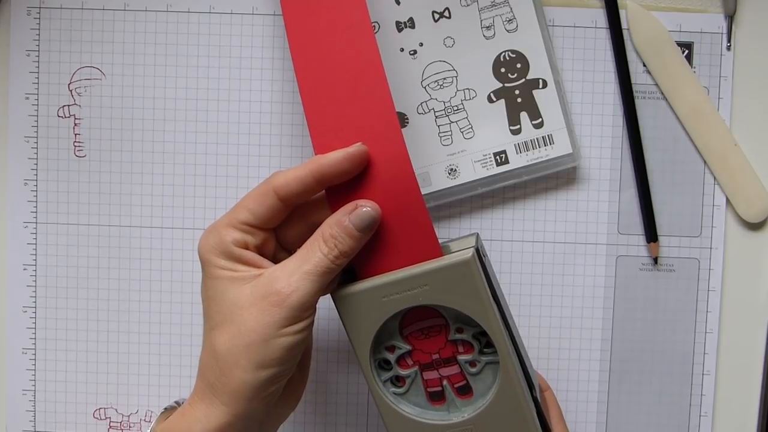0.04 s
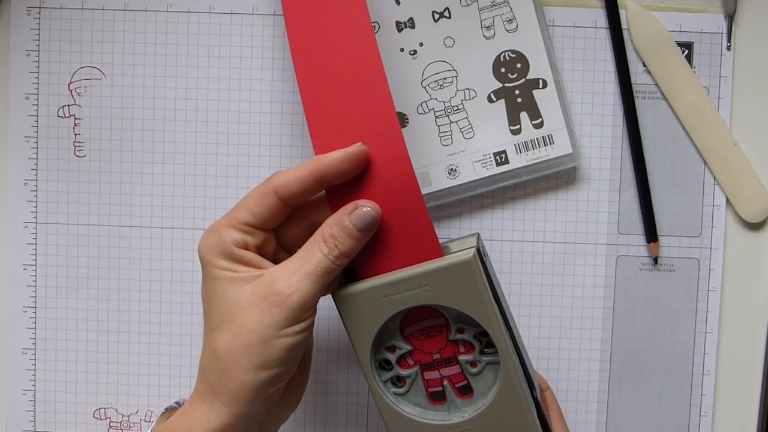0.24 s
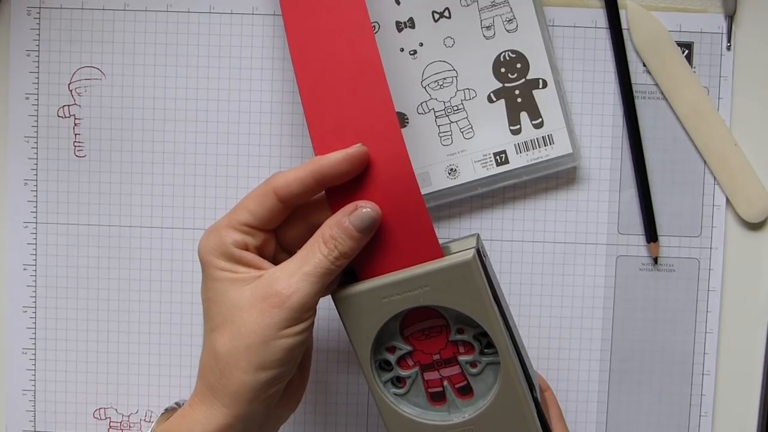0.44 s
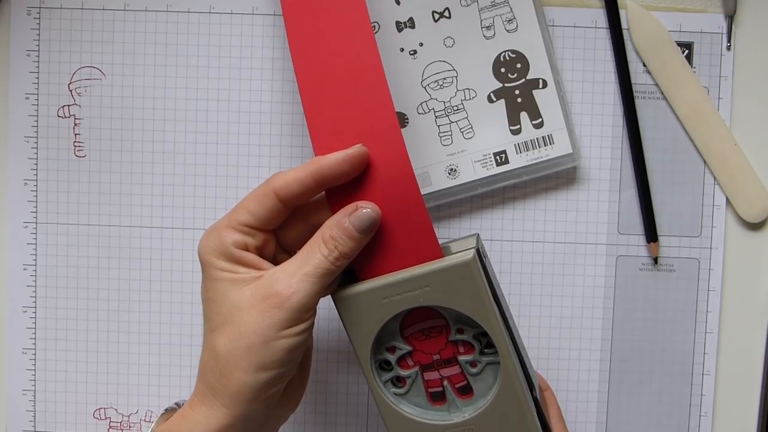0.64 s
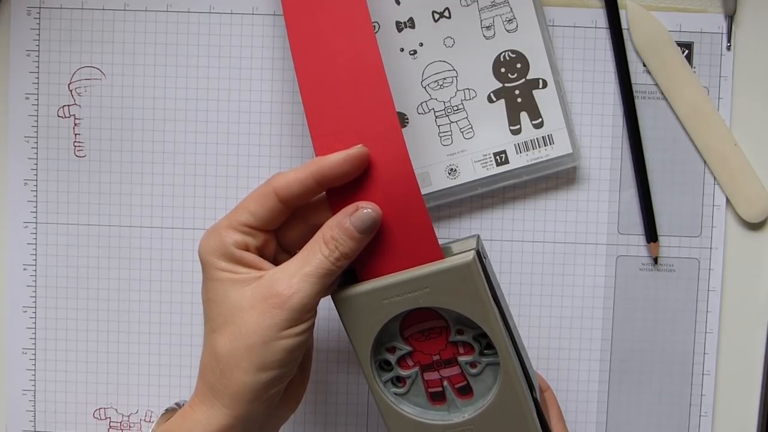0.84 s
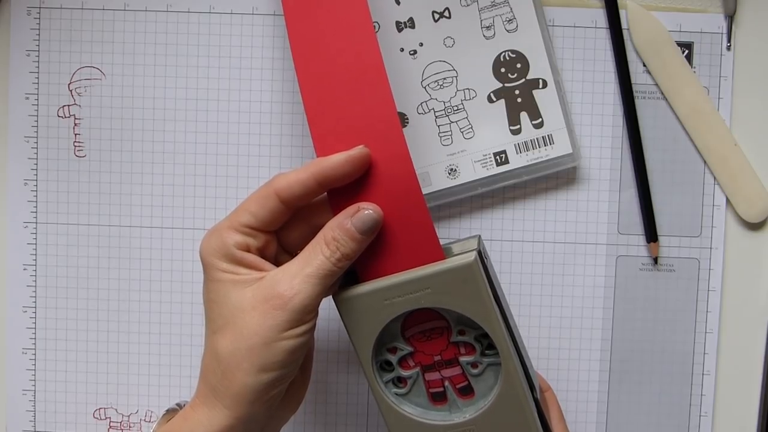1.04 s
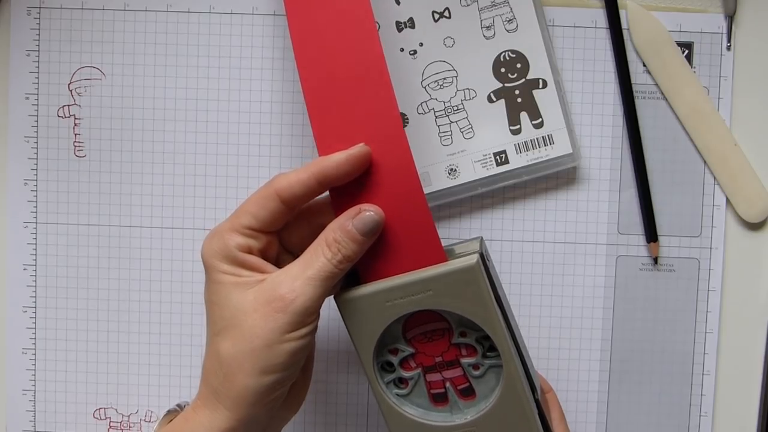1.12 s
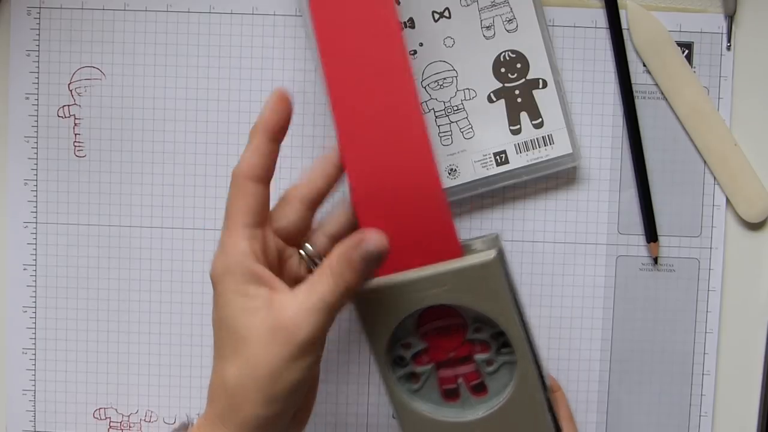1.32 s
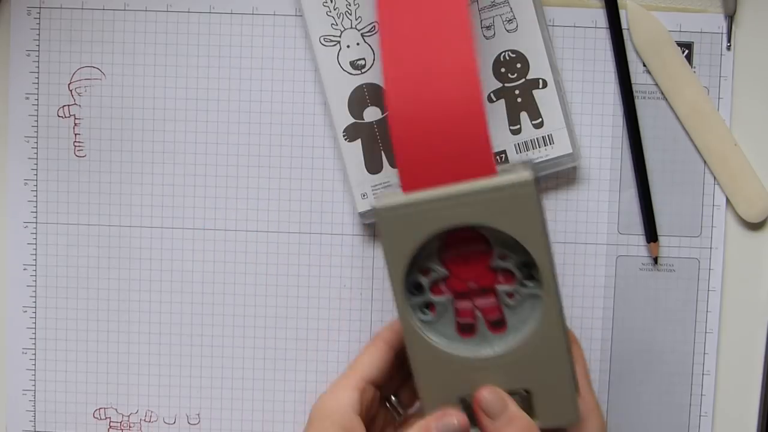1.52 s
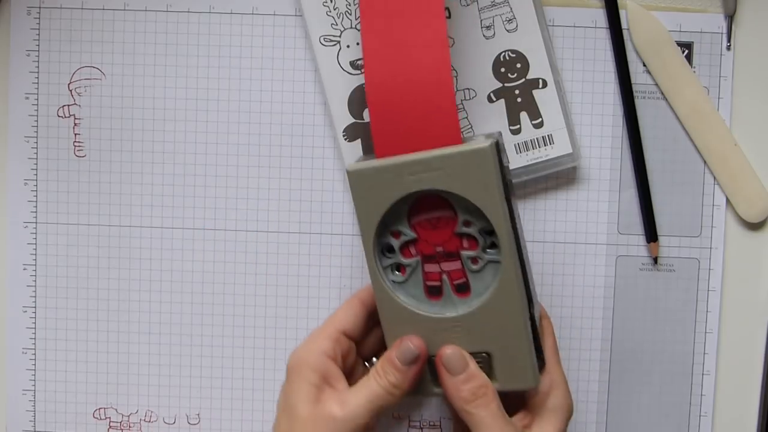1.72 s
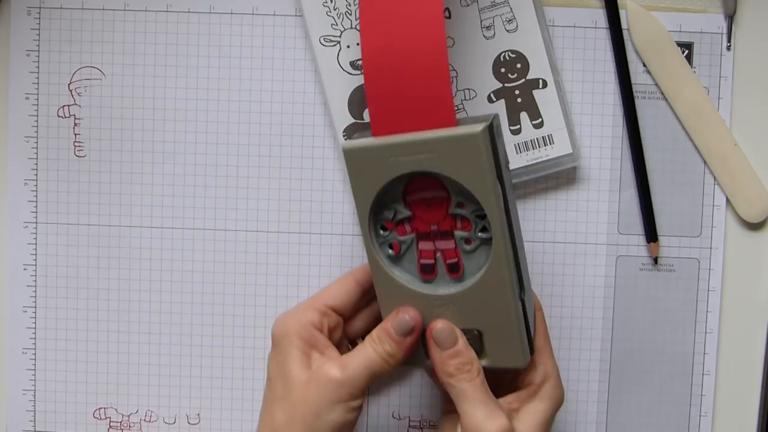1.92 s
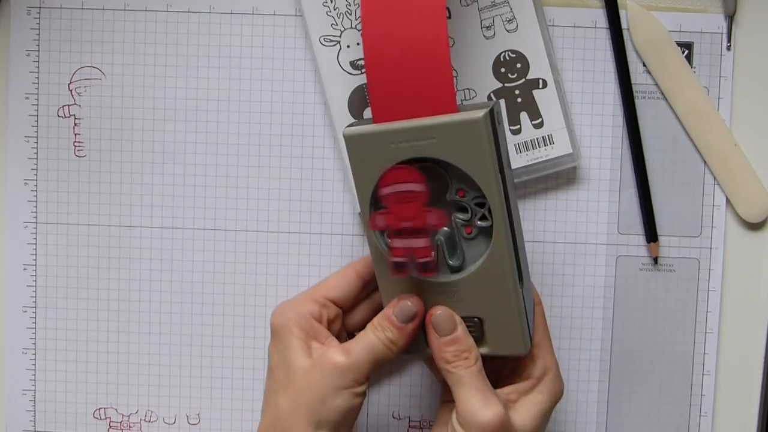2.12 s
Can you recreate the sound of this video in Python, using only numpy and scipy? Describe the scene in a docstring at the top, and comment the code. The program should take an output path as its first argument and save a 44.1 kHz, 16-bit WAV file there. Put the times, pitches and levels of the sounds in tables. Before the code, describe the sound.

A handheld craft punch snaps through card in a small quiet room, heard close. Until about 1.2 s there is only soft hush, a faint low hum and barely audible ticks. From 1.2 to 1.7 s fingers and card rustle and creak, with a tiny metal chink near 1.47. Sharp clacks hit at 1.76, 1.82 and loudest 1.88 s, with gritty scraping, then a bright final snap at 2.12.

```python
"""A craft punch, shifted by hand over a desk and squeezed through card, snaps in sharp clacks in a quiet room.
Each snap rings modes of the housing and its hollow and throws a noise crack; some start with a bare click.
Gritty scraping between them is a dense run of tiny slips exciting the same parts. Before that come
faint ticks, a creak and a rustle of fingers and card, made of shaped noise, and a small metal chink.
Near echoes and a short tail place it all in the room, over a noise hush and faint wavering tones."""
import sys
import numpy as np
from scipy import signal
from scipy.fft import rfft, irfft
from scipy.io import wavfile
from scipy.ndimage import uniform_filter1d

SR = 44100
rng = np.random.default_rng(int(sys.argv[2]) if len(sys.argv) > 2 else 0)


def digitize_waveform(pressure):
    """Quantize a signal to 16-bit integers and store it at the path in sys.argv[1].

    Rows of a 2-D input are taken as channels; values are limited to [-1, 1].
    """
    field = np.atleast_2d(pressure).T
    bounded = np.clip(field, -1, 1)
    quanta = np.round(bounded * 32767).astype(np.int16)
    wavfile.write(sys.argv[1], SR, quanta)


def magnitude_from_level(level_db):
    """Linear magnitude for a level in decibels (20 dB per decade)."""
    exponent = np.asarray(level_db, float) / 20
    return 10 ** exponent


N = 94815  # length in samples

# Modes of the punch housing. Each row: pitch in Hz, relative level in dB, 60 dB decay time in seconds.
HOUSING = [(1500, 3.5, 0.046), (1815, -2.5, 0.034), (2000, 2.5, 0.042), (2180, 1.5, 0.011),
           (2394, -4, 0.059), (2600, -1, 0.041), (2958, -2.5, 0.039), (3190, -3, 0.039), (3665, -7, 0.081),
           (4100, 0.5, 0.031), (4597, 2.5, 0.017), (5100, -0.5, 0.019), (5450, 9.5, 0.0095)]
# Modes of the hollow of the punch and the desk under it. Each row: pitch in Hz, relative level in dB,
# 60 dB decay time in seconds.
HOLLOW = [(390, -6, 0.022), (517, -7.5, 0.068), (623, -1, 0.015), (809, 6, 0.049), (985, 4.5, 0.046),
          (1148, 0, 0.091), (1274, 3, 0.044)]
HOUSING_LOW_HZ, HOLLOW_LOW_HZ = 1275, 320  # little radiates below these


def evened(x):
    """Scales to rms 1."""
    return x / np.sqrt(np.mean(x ** 2) + 1e-20)


def read(points, hz):
    """Reads a table on a log-frequency axis."""
    f, value = np.transpose(points)
    return np.interp(np.log(hz + 1), np.log(f + 1), value)


def add(mix, s, sound):
    """Mixes a sound in at time s."""
    part = mix[round(s * SR):][:len(sound)]
    part += sound[:len(part)]


def colour(x, points):
    """Filters by a spectrum."""
    hz = np.fft.rfftfreq(len(x), 1 / SR)
    return irfft(rfft(x) * magnitude_from_level(read(points, hz)), len(x))


def high_pass(x, hz):
    """Steep causal low cut."""
    return signal.sosfilt(signal.butter(4, hz, "high", fs=SR, output="sos"), x)


def ring(modes, low_hz, favoured_hz=0, detune=0.006):
    """Dying modes, each struck a little differently, those near the favoured pitch harder; energy 1."""
    strike_spread_db, favour_db, favour_octaves = 2, 6.5, 0.1
    hz, db, t60 = np.transpose(modes)[:, :, None]
    t = np.arange(4096) / SR
    strike, sign, shift = rng.standard_normal((3, len(modes), 1))
    octaves_off = np.log2(hz / (favoured_hz + 1))
    db = db + strike_spread_db * strike + favour_db * np.exp(-(octaves_off / favour_octaves) ** 2)
    waves = np.sin(2 * np.pi * hz * (1 + detune * shift) * t) * np.sign(sign)
    out = (magnitude_from_level(db - 60 * t / t60) * waves).sum(0)
    out = high_pass(out, low_hz)
    return out / np.linalg.norm(out)


def crack():
    """A splinter of bright noise dying fast; energy 1."""
    # Spectrum of the splintering noise. Each row: frequency in Hz, relative level in dB.
    crack_tone = [(1200, -27), (1900, -0.5), (2900, 1), (5300, -2.5), (6200, -0.5), (10300, -4.5),
                  (13200, -9.5), (15500, -21), (16500, -39)]
    t60_s = 0.023
    fade = magnitude_from_level(-60 * np.arange(4096) / SR / t60_s)
    out = colour(rng.standard_normal(4096), crack_tone) * fade
    out = high_pass(out, HOUSING_LOW_HZ)
    return out / np.linalg.norm(out)


def snap(ring_db, favoured_hz, thud_db, crack_db):
    """One hard contact knocks the struck spot, rings housing and hollow and throws a crack."""
    rise_s = 0.00049
    rise = np.minimum(np.arange(4096) / SR / rise_s, 1)
    # the struck spot's own quick resonance: 12 dB ahead of the favouring in ring, dying in 11 ms
    parts = HOUSING + [(favoured_hz, 12, 0.011)]
    shell = magnitude_from_level(ring_db) * ring(parts, HOUSING_LOW_HZ, favoured_hz) + magnitude_from_level(crack_db) * crack()
    thud = magnitude_from_level(thud_db) * ring(HOLLOW, HOLLOW_LOW_HZ)
    return high_pass(shell * rise, HOUSING_LOW_HZ) + high_pass(thud * rise, HOLLOW_LOW_HZ)


def click(db, low_hz, full_band_db):
    """Bare metal on metal: one sharp pulse, bright above its edge. A weaker full-band pulse sounds with it."""
    pulse = signal.unit_impulse(512)
    return magnitude_from_level(db) * high_pass(pulse, low_hz) + magnitude_from_level(full_band_db) * pulse


def scrape():
    """Card and die scraping: dense slips of uneven size excite the same parts under the pressure curve."""
    # Pressure curve of the scraping. Each row: time in seconds, rms level of the slips in dB,
    # share of hollow thud in dB and share of crack in dB, both against the housing ring.
    pressure = [(1.75, -71, -2, -9), (1.756, -52.5, 1, 6), (1.79, -41.5, -8.5, -10), (1.812, -42, -32, -4),
                (1.84, -41.5, -1.5, 1), (1.875, -37, -14, -9.5), (1.91, -41.5, 1, 4.5),
                (1.935, -35, -0.5, 0.5), (1.948, -30, -13, -1), (1.975, -43.5, -5, 0.5),
                (1.993, -57, -11, 4), (2.005, -44.5, -10, 4), (2.026, -53, -21, 3.5), (2.05, -55, -7, 6.5),
                (2.065, -36, -7, 4), (2.071, -45, -10.5, 14.5), (2.077, -41.5, -1.5, 7),
                (2.095, -51.5, -6, 7), (2.118, -52, -2, -4), (2.13, -41, -23, 13.5), (2.15, -40, -28, 10.5)]
    slips_per_s, slip_spread_db, slip_detune, runs = 1000, 4.5, 0.03, 6
    s, db, thud_db, crack_db = np.transpose(pressure)
    t, out = np.arange(N) / SR, np.zeros(N)
    curve = magnitude_from_level(np.interp(t, s, db, left=-120))
    for _ in range(runs):  # each run of slips meets the parts struck afresh
        size = magnitude_from_level(slip_spread_db * rng.exponential(1, N).clip(0, 3))
        grit = (rng.random(N) < slips_per_s / runs / SR) * size
        grit = evened(grit * rng.choice([-1, 1], N)) * curve / np.sqrt(runs)
        shell = ring(HOUSING, HOUSING_LOW_HZ, detune=slip_detune)
        thud = ring(HOLLOW, HOLLOW_LOW_HZ, detune=slip_detune)
        for share_db, part in ((0 * s, shell), (thud_db, thud), (crack_db, crack())):
            out += signal.oaconvolve(grit * magnitude_from_level(np.interp(t, s, share_db)), part)[:N]
    return out


def knocks():
    """The punch knocks the desk, whose low modes ring and die."""
    # Knocks on the desk. Each row: start in seconds, energy in dB.
    hits = [(1.821, -12)]
    # Modes of the desk. Each row: pitch in Hz, relative level in dB, 60 dB decay time in seconds.
    desk_modes = [(145, -5, 0.029), (192, -3, 0.073), (248, 0, 0.054), (320, -2.5, 0.046),
                  (487, 7.5, 0.057), (540, -1, 0.051)]
    out = np.zeros(N)
    for s, db in hits:
        add(out, s, magnitude_from_level(db) * ring(desk_modes, low_hz=150))
    return out


def chinks():
    """A small metal part chinks: high modes ring under a thin bright crack."""
    # Chinks of the metal part. Each row: start in seconds, energy of the ring in dB.
    strikes = [(1.461, -26.5), (1.48, -22.5), (1.484, -32)]
    # Modes of the part. Each row: pitch in Hz, relative level in dB, 60 dB decay time in seconds.
    part_modes = [(7380, -2.5, 0.02), (9900, -0.5, 0.029), (10700, -5, 0.033), (10360, -2, 0.052),
                  (10600, 0, 0.052), (11000, -8, .02), (14700, -3, 0.015), (15300, -3, .02)]
    out = np.zeros(N)
    for s, db in strikes:
        splinter = magnitude_from_level(-1) * high_pass(crack(), 5500)
        add(out, s, magnitude_from_level(db) * (ring(part_modes, HOUSING_LOW_HZ) + splinter))
    return out


def ticks():
    """Handling ticks and creaks: short bursts of noise, each narrowed around its own pitch."""
    # Ticks and creaks. Each row: start in seconds, level in dB ahead of the low cut, centre in Hz,
    # width at half amplitude in Hz, time constant of the bell-shaped fade in seconds.
    bursts = [(0.274, -57, 9900, 3620, 0.0082), (0.451, -62, 1500, 2000, 0.055),
              (0.493, -57.5, 1470, 150, 0.0094), (.609, -64, 7160, 1000, 0.013),
              (0.736, -61.5, 4530, 3500, 0.008), (0.816, -57, 9500, 4000, 0.0056),
              (1.239, -58.5, 2400, 3000, 0.0069), (1.311, -57, 1840, 203, 0.0089),
              (1.312, -61, 4940, 500, 0.0085), (1.391, -61.5, 4780, 600, 0.049),
              (1.373, -57.5, 1860, 60, 0.022), (1.409, -61.5, 3210, 150, .02),
              (1.399, -52, 1810, 250, 0.018), (1.442, -48.5, 1290, 2500, 0.0066),
              (1.455, -53, 1200, 2000, 0.023), (1.457, -47, 1480, 150, 0.013),
              (1.517, -65.5, 5100, 800, 0.062), (1.545, -69, 8300, 500, 0.026),
              (1.569, -63, 5100, 707, 0.029), (1.703, -62.5, 4970, 1200, 0.023)]
    t, f = np.arange(4096) / SR, np.fft.rfftfreq(4096, 1 / SR)
    out = np.zeros(N)
    for s, db, hz, width, length in bursts:
        fuzz = evened(irfft(rfft(rng.standard_normal(4096)) / (1 + (2 * (f - hz) / width) ** 2)))
        shape = np.minimum(t / 0.002, 1) * np.exp(-(t / length) ** 2)
        burst = evened(fuzz * shape) * np.sqrt(np.mean(shape ** 2))
        add(out, s, high_pass(magnitude_from_level(db) * burst, 330))
    return out


def rustle():
    """Fingers and card shifting: coloured noise with a fine grain, riding a level curve."""
    # Level curve of the rustle. Each row: time in seconds, level in dB.
    motion = [(1.17, -78), (1.22, -64.5), (1.25, -64), (1.3, -62.5), (1.345, -83), (1.391, -62.5),
              (1.411, -55.5), (1.43, -63.5), (1.47, -61), (1.5, -60), (1.54, -61.5), (1.585, -59),
              (1.61, -66.5), (1.681, -62.5), (1.71, -64), (1.76, -69)]
    # Spectrum of the rustle. Each row: frequency in Hz, relative level in dB.
    rustle_tone = [(710, -6), (1200, -3), (1490, -3.5), (1620, 0), (2920, -9), (8700, -10), (10300, -10.5),
                   (12500, -15), (15500, -26.5)]
    grain_db = 3
    s, db = np.transpose(motion)
    grain = magnitude_from_level(grain_db * evened(uniform_filter1d(rng.standard_normal(N), 150)))
    noise = evened(grain * colour(rng.standard_normal(N), rustle_tone))
    return noise * magnitude_from_level(np.interp(np.arange(N) / SR, s, db, left=-120, right=-120))


def room(x):
    """A few near echoes, then a sparse tail dying band by band, partly different per side."""
    # Echoes off the desk and near surfaces. Each row: delay in seconds, level in dB.
    echoes = [(.0023, -24), (.0068, -20), (0.0138, -25)]
    # Decay of the tail. Each row: frequency in Hz, 60 dB decay time in seconds.
    decay = [(200, 0.24), (1000, 0.29), (4000, 0.22), (10000, 0.28)]
    # Part of the tail that differs between the sides. Each row: frequency in Hz, level in dB.
    side_tone = [(200, -11), (1000, -6.5), (4000, -13.5), (10000, -5.5)]
    tail_db, lean_db = -9, 0.85  # the direct sound leans right
    taps = np.zeros((2, SR // 2))
    at = np.arange(200, SR // 2 - 20, 20) + rng.integers(0, 20, (2, (SR // 2 - 201) // 20))
    np.put_along_axis(taps, at, rng.choice([-1., 1.], at.shape), 1)
    hz, t, z = signal.stft(taps, SR, nperseg=256)
    z[1] *= magnitude_from_level(read(side_tone, hz))[:, None]
    fade = magnitude_from_level(-60 * t / read(decay, hz)[:, None])
    mid, side = signal.istft(z * fade, SR, nperseg=256)[1]
    response = magnitude_from_level(tail_db) * (mid + np.outer([1, -1], side)) / np.linalg.norm(mid)
    response[:, 0] += magnitude_from_level([-lean_db, lean_db])
    for delay, db in echoes:
        response[:, round(delay * SR)] += magnitude_from_level(db)
    return signal.fftconvolve(x[None], response, axes=1)[:, :N]


def hush():
    """Steady, slightly patchy room noise with wavering low resonances."""
    # Spectrum of the hush. Each row: frequency in Hz, relative level in dB.
    hush_tone = [(20, -7), (60, -8.5), (125, -9.5), (250, -8), (420, -3.5), (560, -1.5), (1050, -1.5),
                 (1300, -7.5), (2500, -11.5), (3200, -18), (8000, -18), (13000, -22.5), (16000, -28)]
    # Broad resonances of the room noise. Each row: centre in Hz, width in Hz, relative level in dB.
    hums = [(247, 53, -6), (597, 29, 5), (693, 60, -2.5), (835, 136, -10.5), (1025, 27, -2),
            (4020, 260, -20)]
    # Left-right likeness. Each row: frequency in Hz, correlation from -1 to 1.
    likeness = [(60, 0.6), (180, 0.64), (550, -0.66), (1650, 0.53), (4970, 0.67), (15000, 0.95)]
    hush_db, hums_db, swell_db, patchy_db = -61.5, -65.5, 2, 0.6
    frames, hz = (N // 256 + 5) // 2 + 4, np.fft.rfftfreq(2048, 1 / SR)
    a, b, c, d, patches = rng.standard_normal((frames, len(hz), 5)).T
    swell = evened(uniform_filter1d(patches[0], 10))
    patches = evened(uniform_filter1d(uniform_filter1d(patches, 14, 0), 8, 1))
    same = np.clip(read(likeness, hz), -1, 1)[:, None]
    left = a + 1j * b
    right = same * left + np.sqrt(1 - same ** 2) * (c + 1j * d)
    z = np.array([left, right]) * magnitude_from_level(patchy_db * patches)

    def shaped(gain):
        return evened(signal.istft(z * gain, nperseg=2048, noverlap=1536)[1][:, :N])

    bumps = sum(magnitude_from_level(db) / (1 + (2 * (hz - f) / width) ** 2) for f, width, db in hums)
    wide = shaped(magnitude_from_level(read(hush_tone, hz))[:, None])
    low = shaped(bumps[:, None] * magnitude_from_level(swell_db * swell))
    return magnitude_from_level(hush_db) * wide + magnitude_from_level(hums_db) * low


def tones():
    """Faint sines that drift a little in pitch and level."""
    # Steady tones of the room. Each row: pitch in Hz, rms level in dB ahead of the waver, rms pitch waver in Hz.
    hum_lines = [(248.4, -73, 3.04), (346, -79, 2.82), (559.5, -75, 4.39)]
    level_waver_db = 2.5
    drift = uniform_filter1d(rng.standard_normal((len(hum_lines), 2, N // 512 + 2)), 9, axis=2)
    out = np.zeros(N)
    for (hz, db, waver_hz), slow in zip(hum_lines, drift):
        pitch, level = (np.interp(np.arange(N) / 512, np.arange(len(v)), evened(v)) for v in slow)
        phase = 2 * np.pi * np.cumsum(hz + waver_hz * pitch) / SR
        out += np.sqrt(2) * magnitude_from_level(db + level_waver_db * level) * np.sin(phase)
    return out


def scene():
    """Punch and hands in the room, over the hush."""
    # Die snaps and their early reflections off the desk. Each row: start in seconds, housing ring energy
    # in dB, favoured pitch in Hz, hollow thud energy in dB, crack energy in dB; energies are ahead of
    # the onset ramp and low cut.
    snaps = [(1.7615, 2, 2600, -14.5, -9.5), (1.7632, -1.5, 4750, -10.5, -10.5),
             (1.7690, -8, 2740, -15, -10.5), (1.7722, -8, 4100, -27, -15), (1.8195, 0, 2220, -16, -7),
             (1.8208, -1, 5460, -14, -4), (1.827, -5, 5360, -17, -24), (1.8815, 9.5, 5450, -2.5, 2),
             (1.8840, 3, 1500, -1.5, 2.5), (1.8870, 9.5, 1995, -7, -1.5), (1.8899, 9.5, 1997, -11, 2.5),
             (1.9022, -4, 1500, -12, -19), (1.9400, -3.5, 2250, -6, -8), (1.9990, -14, 1890, -31, -16.5),
             (2.1229, -3, 4160, -25, 1), (2.1224, 9, 1785, -47, 6.5), (2.1290, -1, 1740, -41, 2)]
    # Bare clicks at the front of a snap. Each row: start in seconds, energy in dB ahead of the low cut,
    # low edge in Hz, level of the full-band pulse in dB.
    clicks = [(1.8192, -5.5, 11000, -50), (1.8813, -8, 4000, -50), (2.1229, 2.5, 2000, -9.5),
              (2.1234, -1, 2600, -38)]
    desk = scrape() + knocks() + chinks() + ticks() + rustle()
    for s, *strike in snaps:
        add(desk, s, snap(*strike))
    for s, *strike in clicks:
        add(desk, s, click(*strike))
    return room(desk) + hush() + tones()


def low_pass(x):
    """Removes everything above the highest recorded frequency."""
    return signal.sosfilt(signal.butter(12, 16380, fs=SR, output="sos"), x)


def record(dry):
    """Microphone band limit, then a hard ceiling at full scale."""
    mic_top_hz = 15600
    mic = signal.firwin(101, mic_top_hz, fs=SR)
    mix = signal.oaconvolve(dry, mic[None], "same")
    return low_pass(np.clip(mix, -1, 1))


dry = scene()
out = record(dry)
digitize_waveform(out)
```